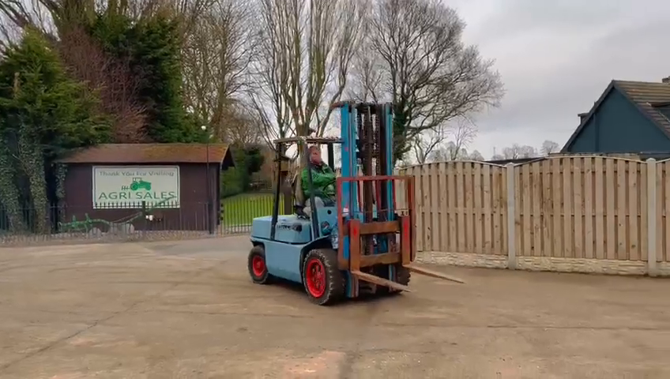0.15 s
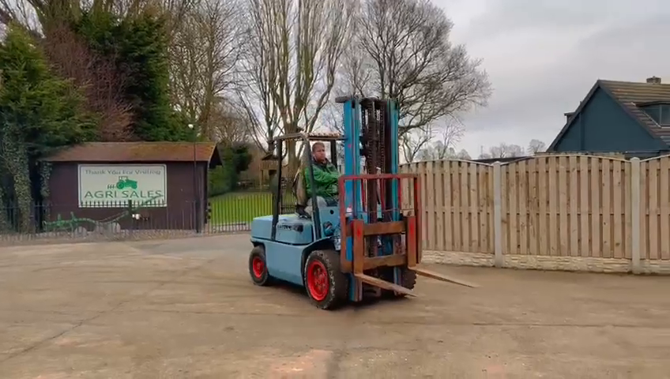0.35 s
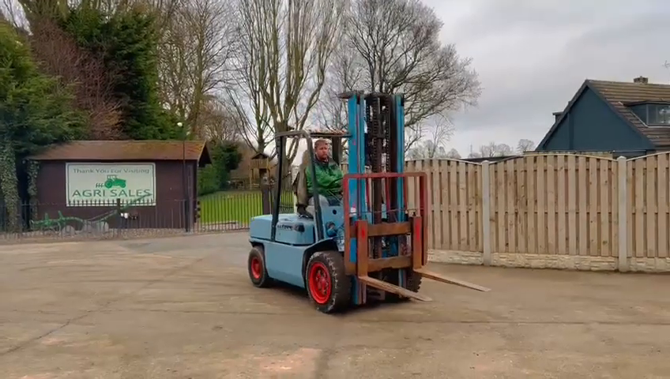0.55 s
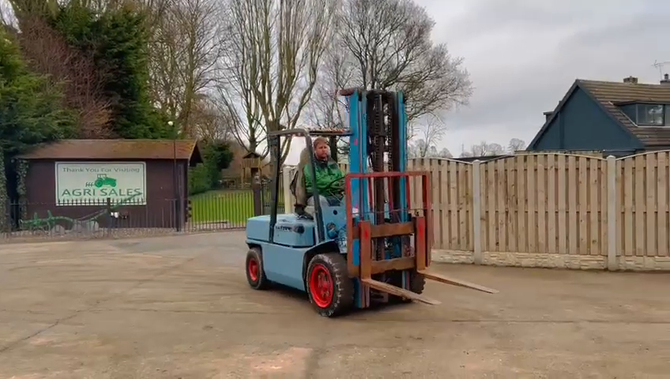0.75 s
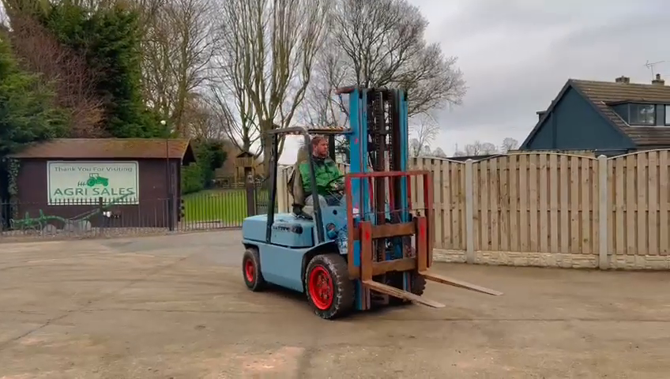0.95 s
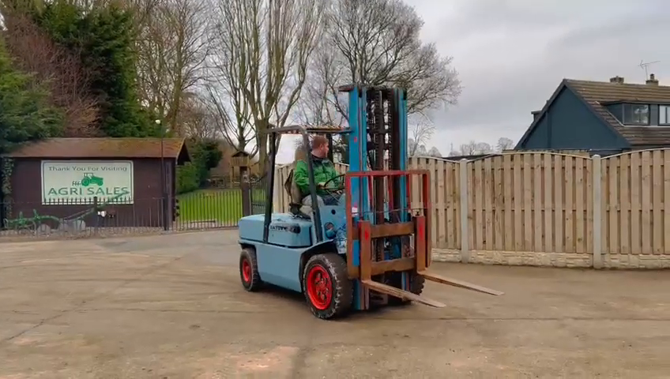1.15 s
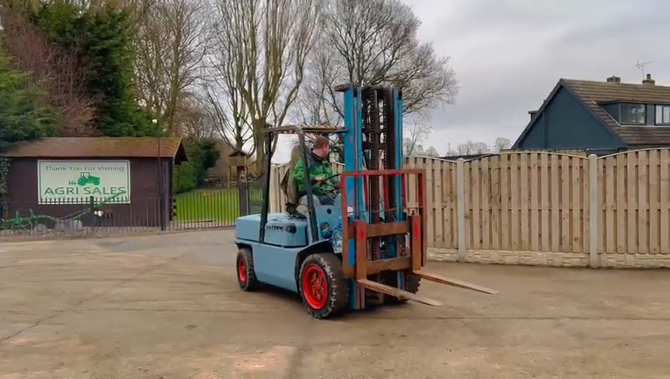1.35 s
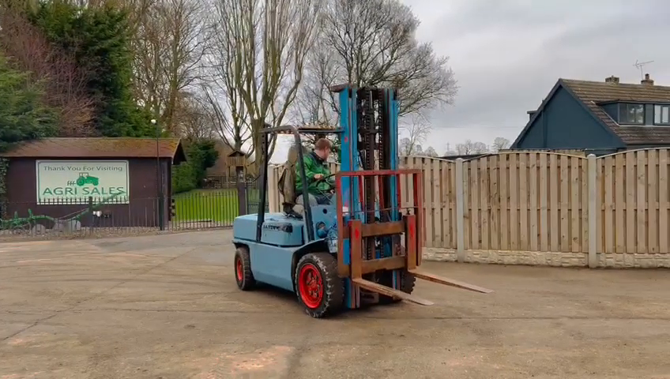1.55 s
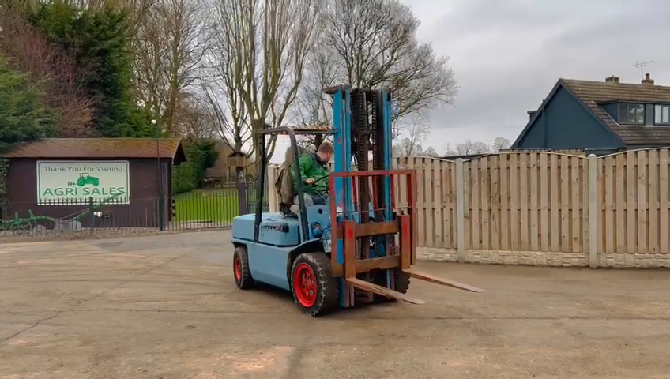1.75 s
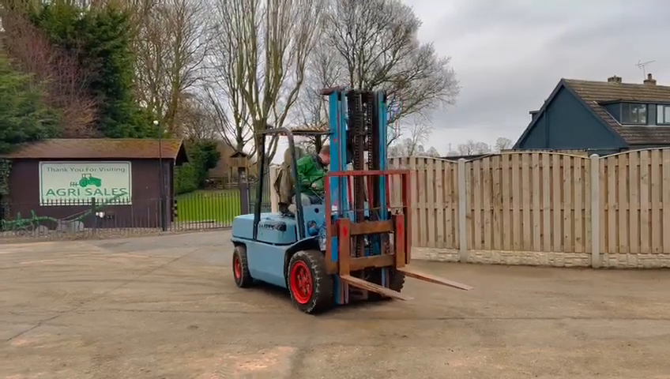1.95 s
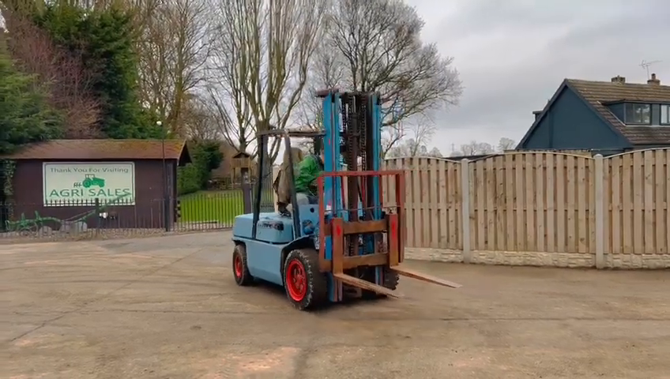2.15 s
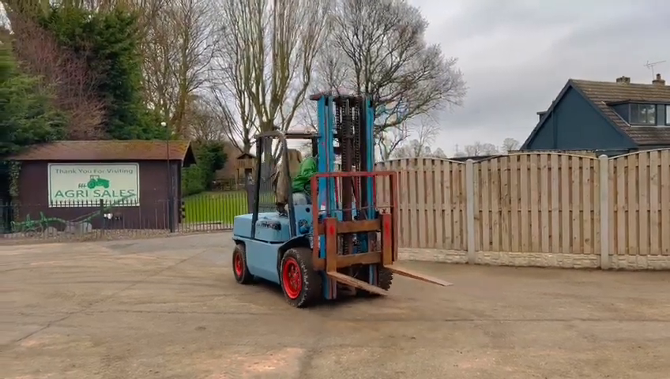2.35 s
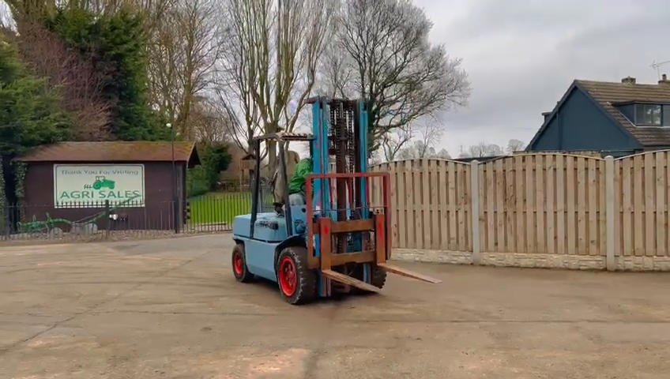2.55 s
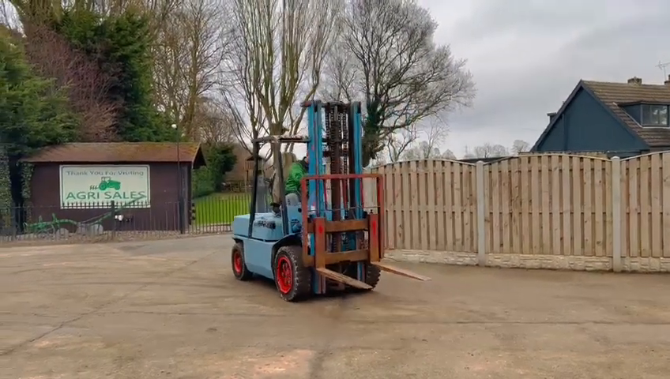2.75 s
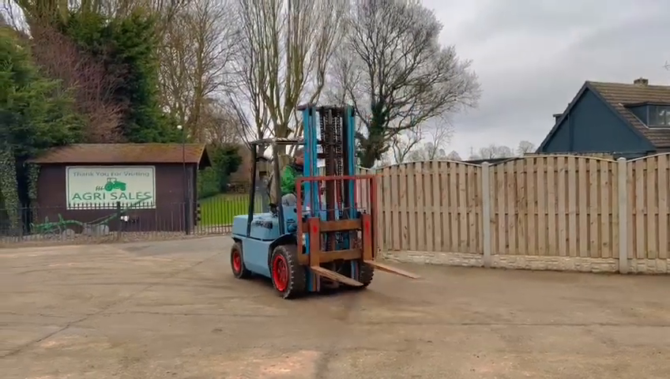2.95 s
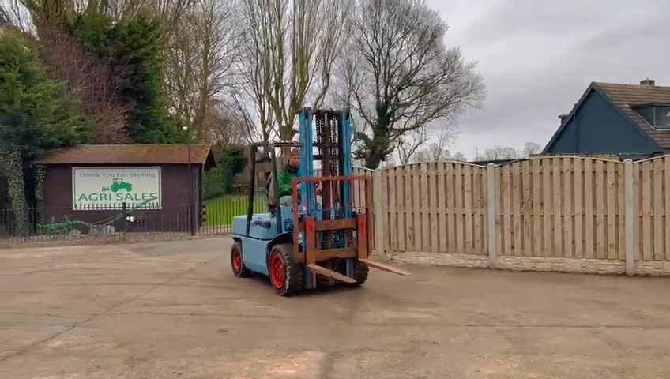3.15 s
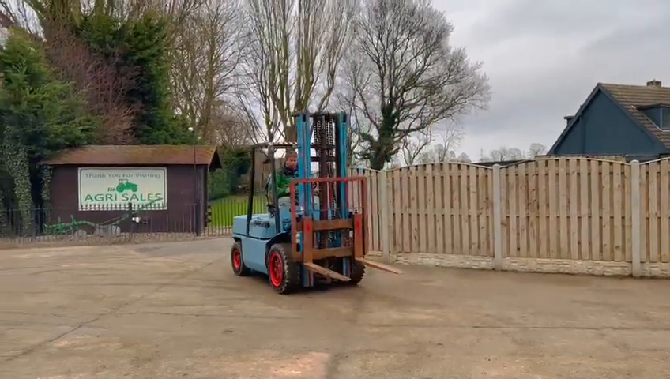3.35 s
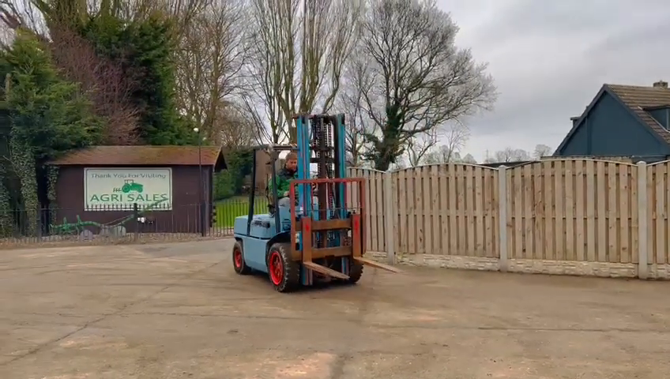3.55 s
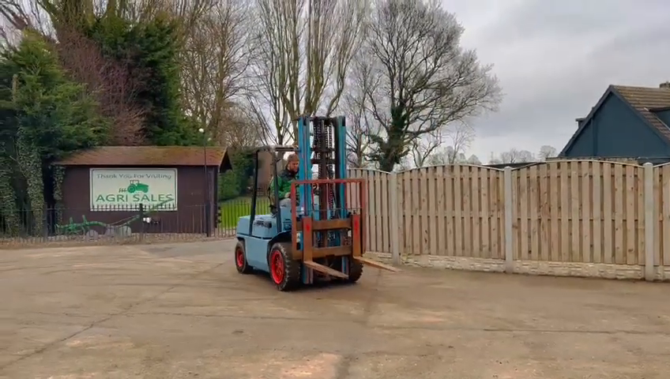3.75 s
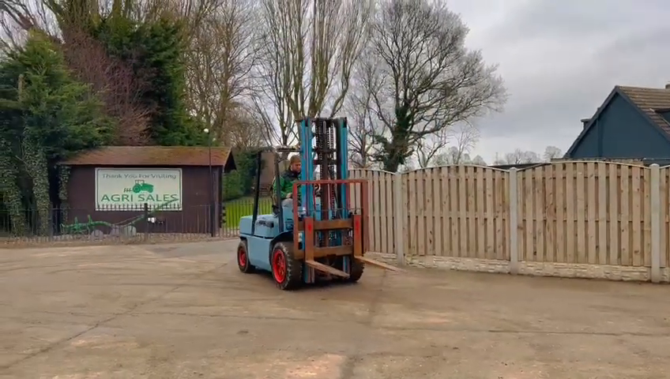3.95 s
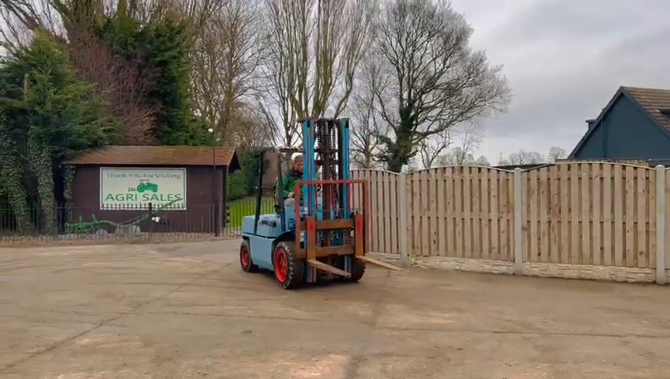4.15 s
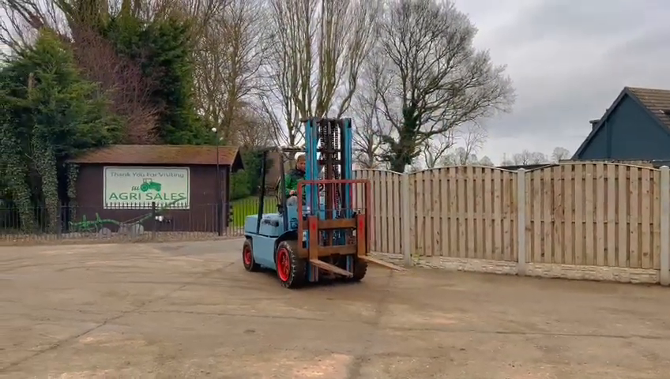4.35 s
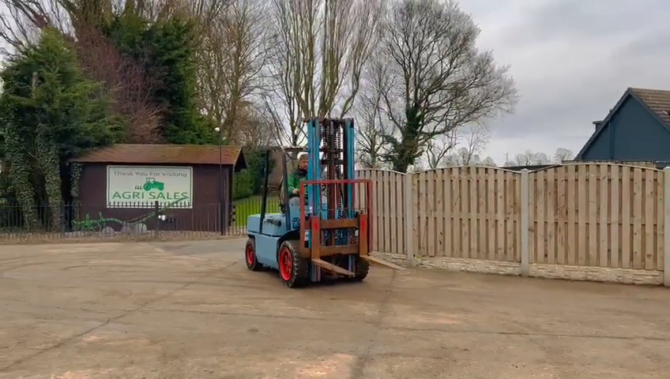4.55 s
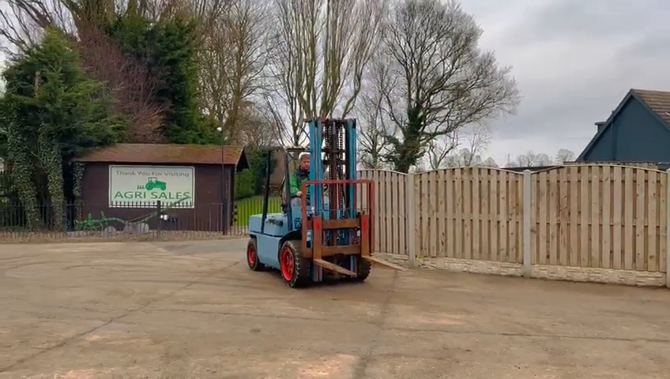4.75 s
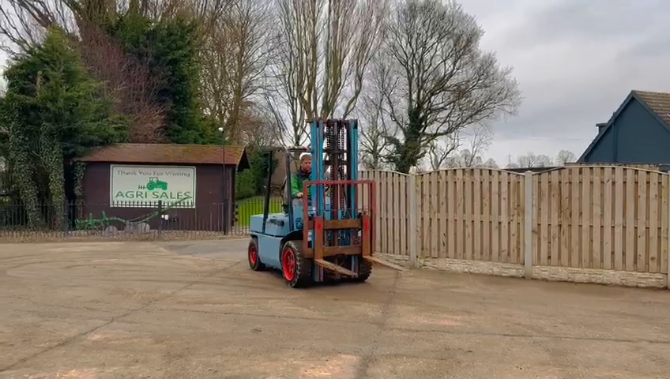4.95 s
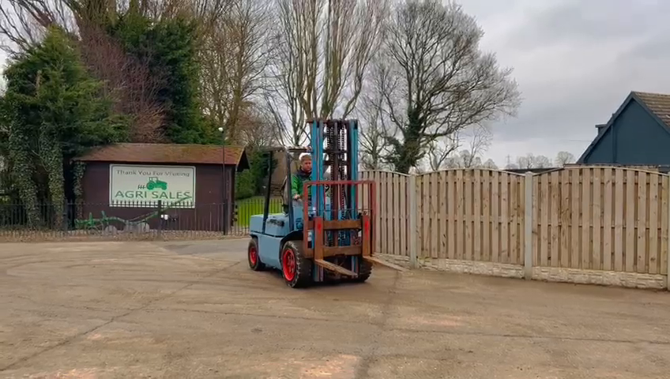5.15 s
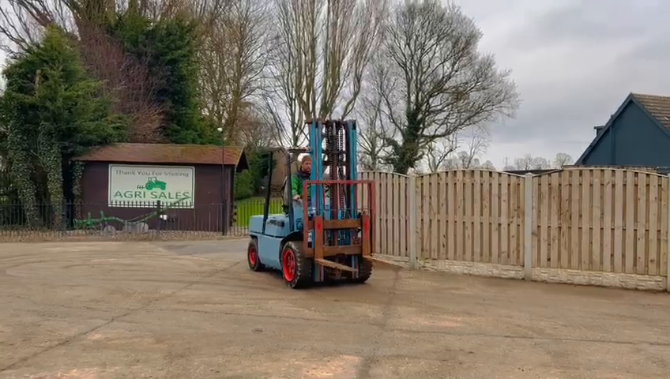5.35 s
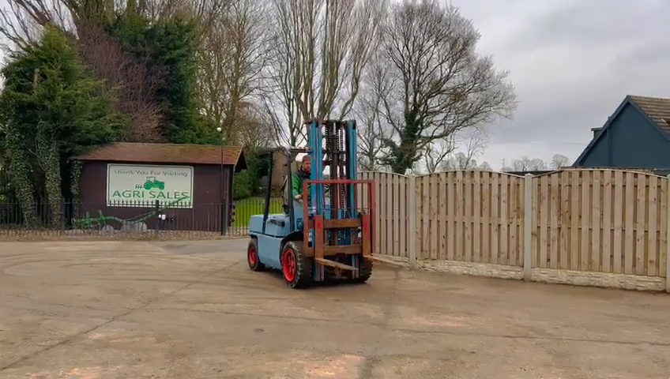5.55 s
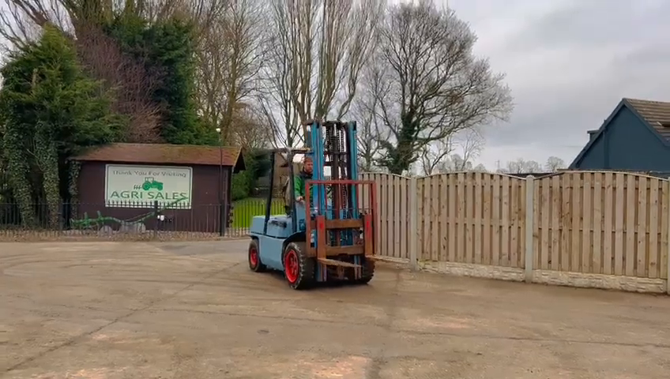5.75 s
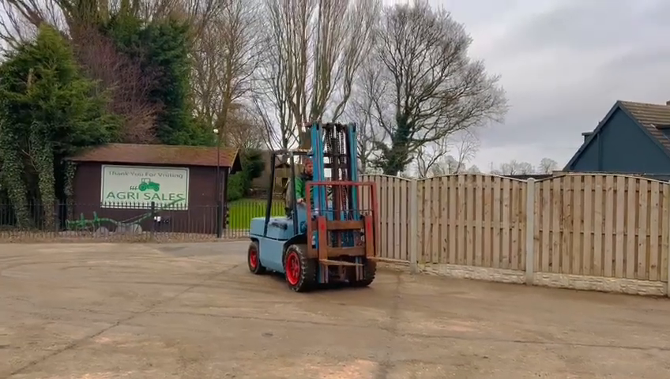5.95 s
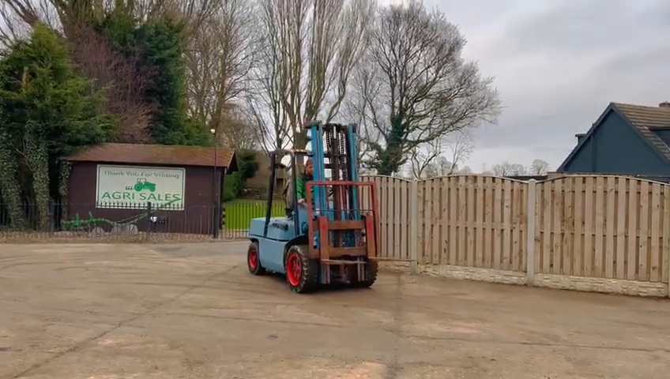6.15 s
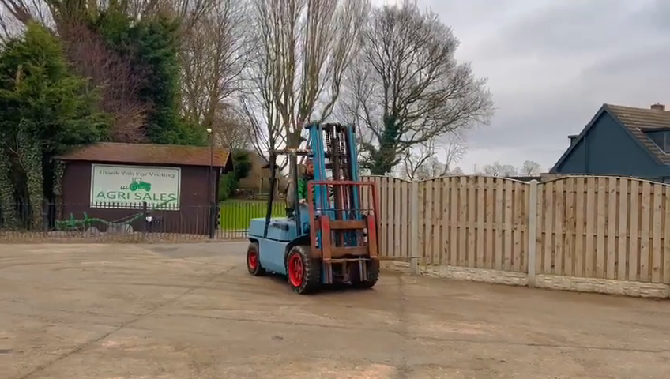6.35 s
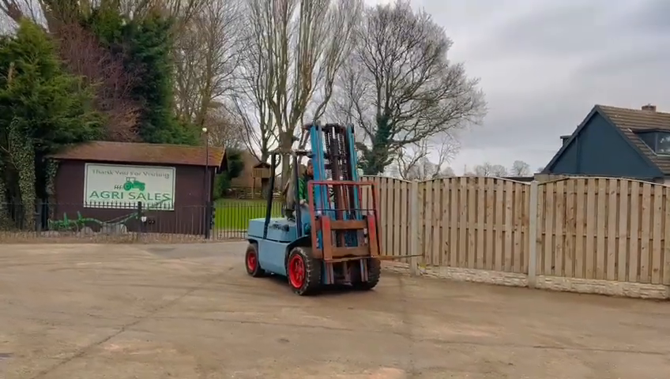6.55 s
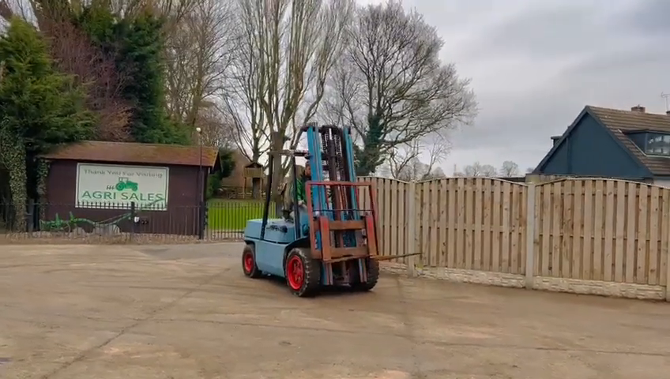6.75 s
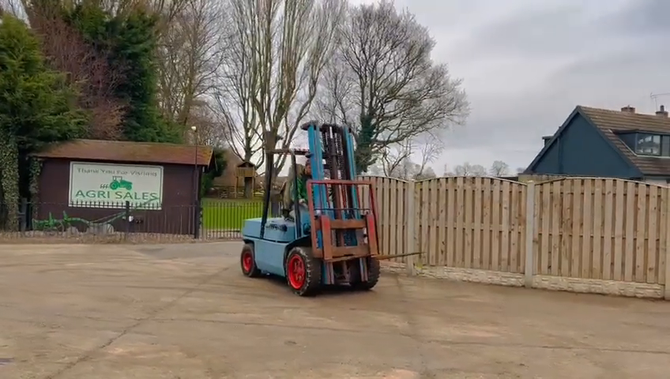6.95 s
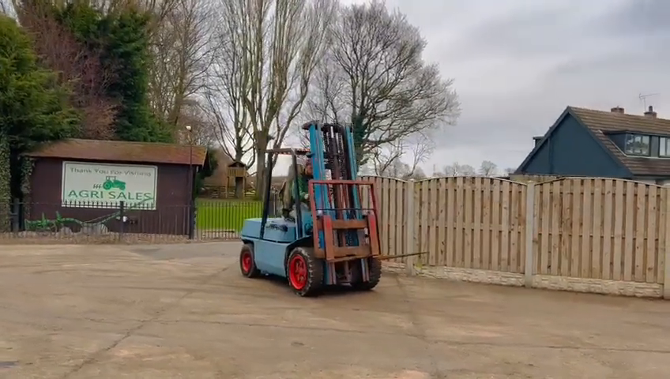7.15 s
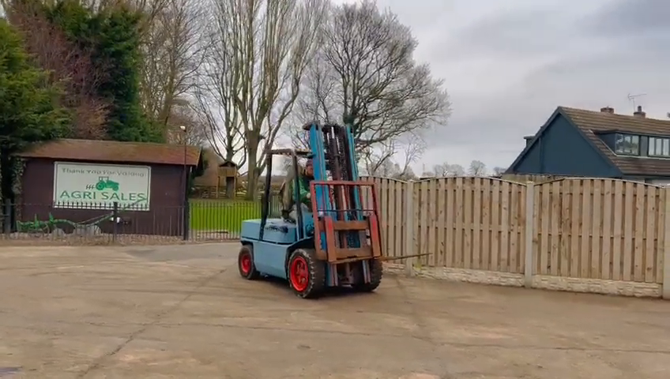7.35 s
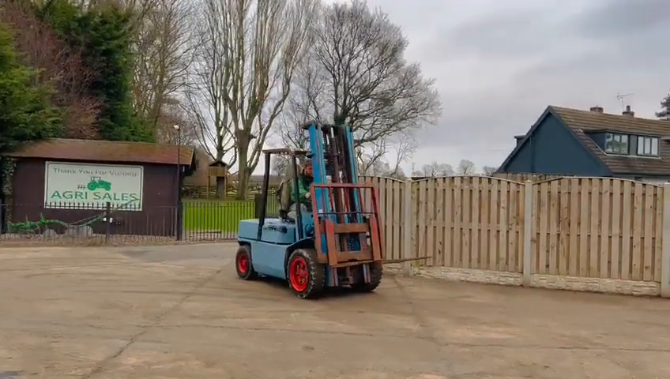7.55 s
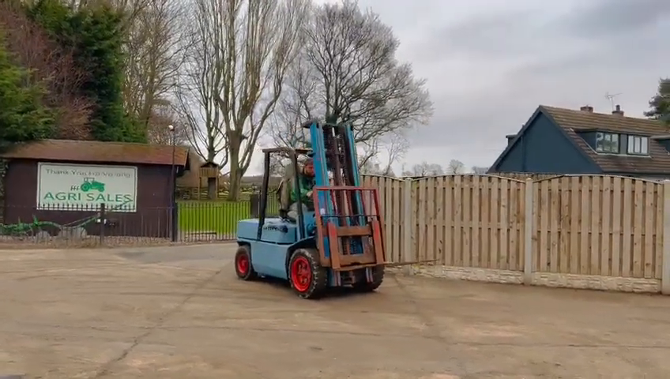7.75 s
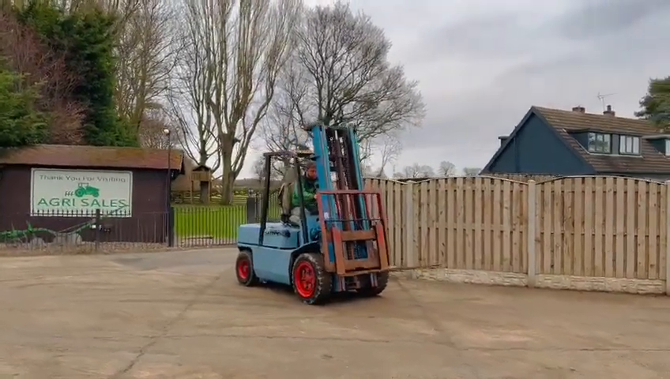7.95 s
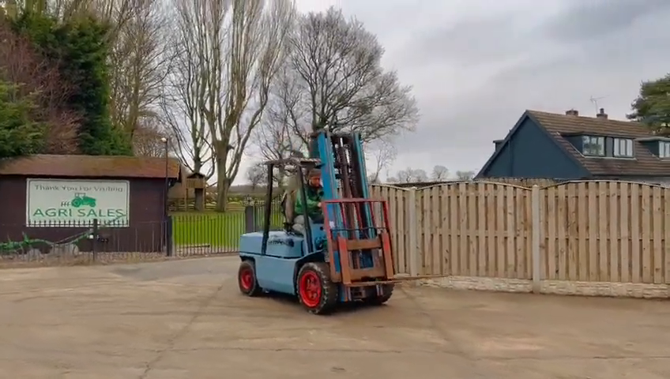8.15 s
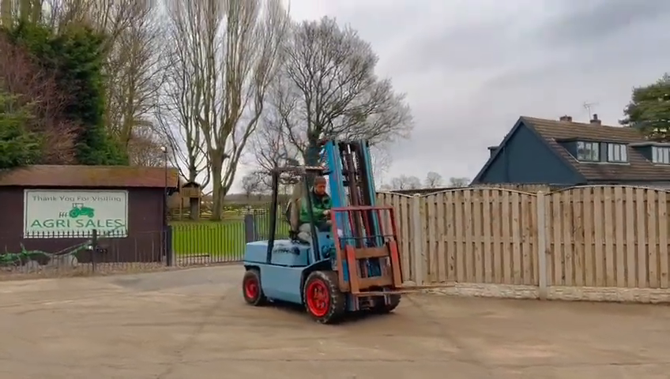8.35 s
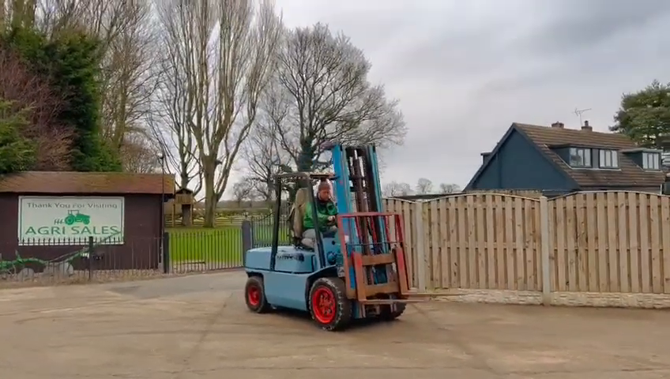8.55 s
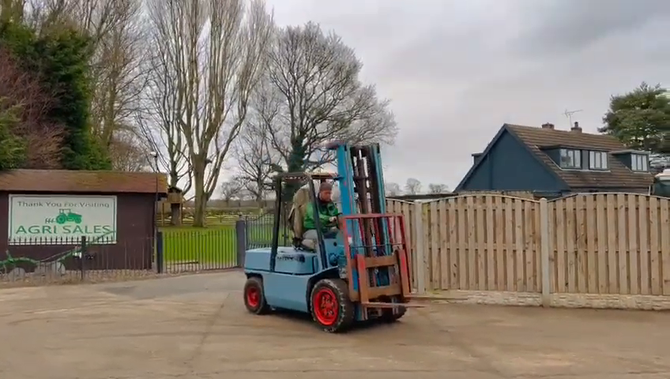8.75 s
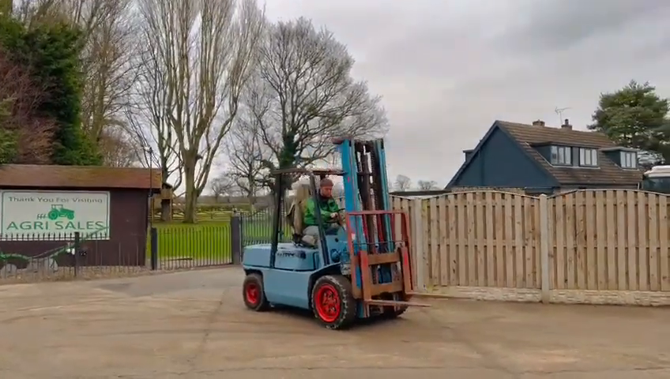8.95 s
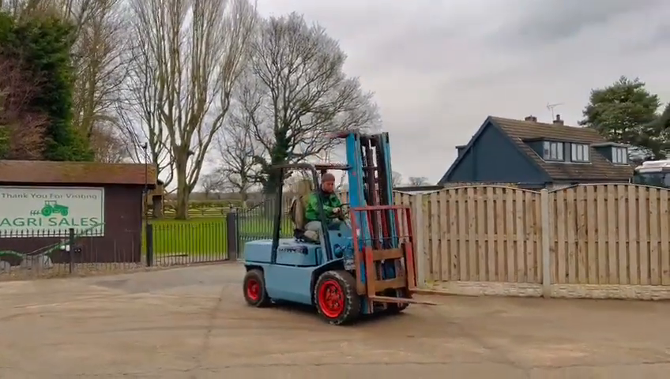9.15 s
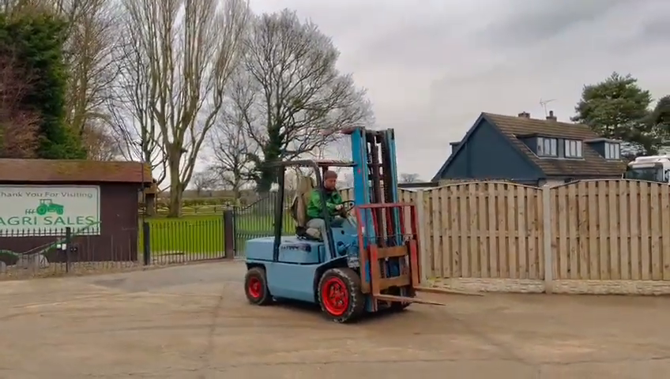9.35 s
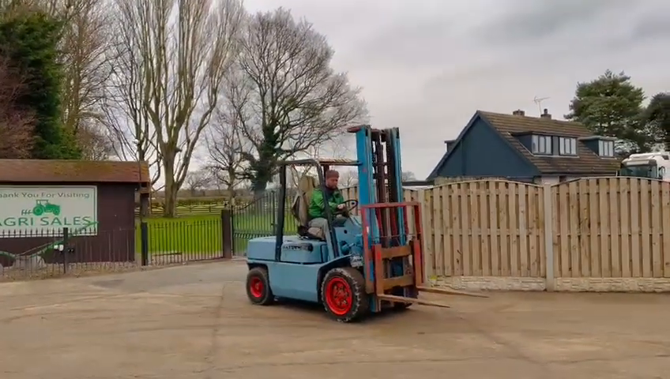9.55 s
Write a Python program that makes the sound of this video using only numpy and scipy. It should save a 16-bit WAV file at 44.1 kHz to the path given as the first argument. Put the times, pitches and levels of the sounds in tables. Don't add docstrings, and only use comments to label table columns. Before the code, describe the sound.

Outdoors in stereo, a nearby old diesel truck with lifting forks drives back and forth. Its engine growls and clatters in short throttle surges, drops into slow lumpy knocking, revs sharply again and settles into working growl. Bright hard firing bursts open some surges; low exhaust tones hum and waver. Loose steel forks knock with muffled double clunks. Fence and ground scatter the upper clatter across both sides.

```python
import sys
import numpy as np
from scipy import signal
from scipy.fft import rfft, irfft, next_fast_len
from scipy.io import wavfile
from scipy.ndimage import uniform_filter1d, map_coordinates

SR = 44100
rng = np.random.default_rng(int(sys.argv[2]) if len(sys.argv) > 2 else 0)


def output_pcm(signal):
    pcm = np.clip(np.atleast_2d(signal).T, -1, 1) * 32767
    wavfile.write(sys.argv[1], SR, np.round(pcm).astype(np.int16))


def volts_from_db(level):
    exponent = np.asarray(level, float) / 20
    return 10 ** exponent


N = 424241

# (time [s], asked firing rate [Hz], load [dB], injection knock [dB])
PEDAL_STROKES = [(0.021, 49.0, 2, 0), (0.157, 59.8, -2, -2), (0.221, 73.4, 0.5, 7), (0.457, 28.2, -1.5, -1),
                 (0.76, 64.8, 3.5, 2.5), (1.128, 38.3, 2, -1.5), (1.585, 61.2, 3, 2.5),
                 (1.966, 43.3, 1, -1), (2.359, 54, 1.5, 0.5), (2.551, 55.2, -0.5, 3),
                 (2.82, 7.6, -15.5, 10.5), (3.22, 42.9, 0.5, -4), (3.5, 10.1, -12.5, 8),
                 (3.69, 29.2, -2, -0.5), (3.94, 26.9, -7, 4.5), (4.198, 29.1, -9, 5.5),
                 (4.772, 73.5, 4.5, -5.5), (4.901, 91.2, 0, 7.5), (5.103, 80.6, -3, 5.5),
                 (5.235, 20.2, 0.5, -6), (5.522, 70.0, 4.5, -5), (5.654, 45.8, 1.5, 2.5),
                 (5.957, 49.8, 2.0, 4), (6.408, 48.9, 1.5, 4.5), (6.777, 44.5, 2.0, 3),
                 (7.093, 89.5, 0.5, 6.5), (7.276, 72, -2, 1.5), (7.417, 60, -4.5, 1.5),
                 (7.593, 55.6, -2.5, 1.5), (8.018, 29.8, 1.5, -3), (8.135, 36.8, 2, 0),
                 (8.38, 54.5, 2, 3.5), (8.857, 44, 1.5, -1.5), (9.324, 56, 1.5, 1)]
START_RATE_HZ, USUAL_RATE_HZ = 26.2, 48
LINKAGE_S, FLYWHEEL_S, LOAD_LAG_S, SURGE_LAG_S = .03, .4, 0.093, 0.27
INJECTION_LEAD_S = 0.041
# (time [s], bonnet over block [dB], second order [dB], third order [dB], valve gear [dB])
FACING_SIDES = [(0, -0.5, 0, -2, -10), (.15, -5.5, 0, 6.5, -4.5), (.3, -6.5, 0, 2.5, -8.5),
                (.6, -4.5, 5, -2.5, -5), (1, -6, 2, 1, -5), (1.5, -7.5, 1.5, -3, -1), (2.2, -5, 3, 0.5, -1),
                (2.7, -4, 2.5, -1.5, -2), (3.1, -18, 5.5, 7, -7), (3.5, -11, 6, 3, -4),
                (4.3, -6, 0.5, 2, -4.5), (4.87, -9, 3.5, -2, -5), (5.1, -14.5, -7.5, 4.5, 0),
                (5.5, -11.5, 1, -3, 1), (6.2, -9, -4, 2.5, -3), (6.6, -5, -2, -0.5, -4.5),
                (6.9, -5, -1.2, 0, -2.5), (7.15, -3.5, -3, 0.5, 3.5), (7.3, -1.5, -2, 2.5, 1.5),
                (7.6, -0.5, 0.5, -2, 3.5), (8.3, -1.5, 1.5, 3, -2.5), (8.7, -3.5, -3.2, 0.5, 1),
                (9.1, -7, 0, 0.5, 3), (9.62, -2.5, -1.5, 2.5, 1.5)]
# (usual level [dB], speed [dB/octave], load [dB/dB], speed shortfall [dB/Hz])
BLOCK_LAW, KNOCK_LAW = (-26.5, 7.5, 0.43, 0.13), (-45.5, 7.5, 1.11, 0.2042)
RAPS_DB, RAPS_PER_OCTAVE_DB = -1.5, -7.5

# (pulse size [dB], arrival delay [ms], knock [dB])
CYLINDER_TRAITS = [(1.2, 0.01, 1.5), (-1.5, 1.6, -1.5), (.6, -1.2, .4), (-7, .8, -2.5)]

# (frequency [Hz], density [dB/Hz])
BODY_SPECTRUM = [(120, -35.5), (200, -2), (512, -3), (588, -1.5), (645, -5), (873, -3.5), (936, -2.5),
                 (1650, -8.5), (2450, -17), (3200, -21.5), (4160, -77.5), (7040, -120)]
# (frequency [Hz], width [Hz], level [dB], place in cycle [0-1])
BLOCK_PANELS = [(421.6, 13, -4.5, .75), (384, 7.1, -8.5, .25), (299.4, 6.1, -7, 1), (546, 6.9, -4, 0.4),
                (559, 59, -1.5, .53), (459, 35, -4.5, .6), (607.5, 16, -1, 0.05), (775, 7, -0.5, 0.5),
                (875.6, 15, 3.5, .26), (826, 24, 0.5, .76), (1007, 6.5, -12, 0.96), (1944, 15, -9.5, .15),
                (2233, 42, -13, 0.4)]
# (frequency [Hz], width [Hz], place in cycle [0-1])
BONNET_NEAR = (1251.5, 36, .5)
# (frequency [Hz], width [Hz], place in cycle [0-1])
BONNET_CORNER = (1130, 64, .5)
# (start [s], end [s])
TRUCK_SWING_S = (8.6, 8.85)

# (frequency [Hz], density [dB/Hz])
KNOCK_SPECTRUM = [(880, -32.5), (1500, -3), (1690, -7.5), (1950, -5), (2500, -3.5), (3280, -7), (3550, -6),
                  (4420, -15), (4900, -15.5), (5630, -18), (8600, -25.5), (11200, -30), (18900, -120)]
# (frequency [Hz], width [Hz], level [dB])
LINER_MODES = [(2040, 200, -3), (2513, 260, -3.5), (3990, 540, -7), (4830, 110, -0.5)]
LINER_DB, LINER_FITS_DB = -5.5, 7
# (frequency [Hz], width [Hz], level [dB])
VALVE_MODES = [(4340, 590, -0.5), (4680, 84, 0), (5600, 110, 5), (6450, 340, -5.5), (2250, 110, 1)]

# (firing rate [Hz], order 1 [dB], 2 [dB], 3 [dB], 4 [dB])
PIPE_ORDERS = [(24.9, -50, -40.5, -37, -31), (32.9, -43, -22.5, -24, -23.5),
               (40.2, -34, -14.5, -20.5, -22.5), (46.6, -28, -22, -26, -26.5),
               (46.8, -25, -18, -23.5, -44.5), (51.2, -22, -19, -21, -38), (60.3, -18.5, -17.5, -24, -26),
               (68.4, -14.5, -20.5, -5.5, -42.5)]
# (order 1 [dB/dB], 2 [dB/dB], 3 [dB/dB], 4 [dB/dB])
ORDER_LOAD_SLOPES = (1.6, 0.74, 2.76, 1.5)
UNSTEADY_DB, OVERRUN_LOSS_DB_PER_HZ, FOURTH_SHARE = 1.5, 0.53, 1.22

# (frequency [Hz], level [dB])
PIPE_COLOUR = [(15, -32), (35, -16), (55, 10), (80, 2), (112, 0.5), (140, 9), (165, -15), (200, -6.5),
               (240, -1), (290, -37.5), (345, -32), (385, -14), (430, -53)]
# (frequency [Hz], width [Hz], level [dB])
SILENCER_CHAMBER = (186, 9, 16)
# (firing rate [Hz], level [dB])
THROB_LEVELS = [(25, -32.5), (32, -31.5), (40, -28.5), (46, -24), (49, -27.5), (53, -28.5), (65, -23.5)]

# (frequency [Hz], width [Hz], level [dB])
TAILPIPE_MODES = [(186, 16.8, 2), (146.5, 17, -2)]
PUFF_LEVELS_DB = (-.5, -10, -.5, 2)
# (firing rate [Hz], level [dB])
BOOM_LEVELS = [(24, -55), (27, -24.5), (30, -29), (34, -21), (42, -24.5), (47.5, -22.5), (50, -34.5),
               (65, -42.5)]
BOOM_PER_OVERRUN_DB_PER_HZ, OVERRUN_FULL_HZ = -1, 1.2

# (frequency [Hz], density [dB/Hz])
YARD_SPECTRUM = [(12, -5), (30, -1), (70, 0.5), (250, -23.5), (330, -13.5), (480, -12), (700, -53)]
# (time [s], peak [dB])
COLD_SNAPS = [
    (0.2603, -30.5),
    (0.288, -20),
    (3.3934, -30),
    (4.8344, -23.5),
    (4.937, -21.5),
    (5.022, -28),
    (5.322, -31),
    (7.24, -26.5),
]
# (time [s], length [s], start frequency [Hz], end frequency [Hz], rms level [dB])
SINGING_TONES = [(.5, 0.35, 188.3, 168, -21), (.7, 0.23, 160, 177, -22), (0.918, .8, 765, 763.5, -35.5),
                 (1.32, 0.41, 186, 181.6, -25), (1.7, 0.4, 860.2, 839.5, -34),
                 (2.2, 0.46, 188.2, 199.3, -22), (2.3, 0.57, 836.7, 854, -36),
                 (2.201, .65, 595, 600, -34.5), (3.75, 1.087, 369.2, 383, -43.5),
                 (3.853, 1.003, 591, 587, -44), (5.363, .36, 191.1, 186, -22),
                 (5.55, 1.27, 601, 599.5, -38), (5.851, 1.084, 767, 771.4, -36),
                 (6.279, 0.65, 872.6, 868, -29), (6.201, 0.75, 563.6, 559, -38),
                 (7.252, 0.31, 860.4, 883, -26), (7.5, 0.37, 163.3, 149, -30),
                 (8.62, 0.43, 896, 894.5, -28), (9.022, 0.57, 870, 866.5, -40.5)]
SWELL_S = .12

# (time [s], peak [dB], closing time [ms])
MAST_CLUNKS = [(2.967, -29, 4), (3.029, -33, 2.5), (3.193, -12.5, 0.8), (3.391, -31.5, 5.4), (3.55, -23, 6),
               (3.598, -20.5, 7.1), (3.679, -17, 6.9), (3.828, -32, 1.1), (4.26, -28, 1), (5.331, -3, 2.4),
               (5.454, -20, 1), (5.56, -10, 3.3), (6.78, -7.5, 14), (7.009, -1, 2.7), (8.055, -13.5, 7.3),
               (8.116, -14, 8), (8.197, -19.5, 9), (9.165, -14, 1), (9.491, -15.5, 0.89)]
# (frequency [Hz], level [dB], t60 [s])
MAST_MODES = [(345, -7, .07), (402, -7, .08), (460, -8, .08), (545, -7, .07), (850, -10, .05),
              (1270, -14, .06), (1850, -15, .08)]
REBOUND_S, REBOUND_DB, CRACK_DB = .013, -2, -6

# (frequency [Hz], likeness [0-1], left over right [dB])
PORT_BLEND = [(250, 1, 0), (600, 0.9, 0.5), (920, 0.97, 2), (1204, 0.54, 8.5), (1430, 0.9, 0),
              (1690, 0.5, 1.5), (2650, 0.2, -1.5), (3390, 0.58, 2), (3480, 0.5, -1.5), (4060, 0.1, 3),
              (5000, 0.3, 4), (5570, 0.61, 5), (7200, 0, -0.5), (8160, 0.76, -4.5), (8300, 0.65, 4.5)]
# (frequency [Hz], lead [rad])
LEFT_LEAD = [(600, 0.75), (1030, 1.58), (1300, 0.4), (1620, 2.67), (1980, 7.5), (2410, 5.8), (2930, 9.29),
             (3450, 8.26), (3960, 11.2), (4800, 14), (5680, 10.6), (6250, 14), (8000, 12.35), (8950, 9.78)]
# (frequency [Hz], lead [rad])
LEFT_LEAD_FROM = (280, 0)
# (time [s], share [0-1])
BEARING_SHARE = [(0, 0.04), (6.9, 0.05), (7.4, 0.94), (8.6, 0.15), (9.62, 1)]


def unit(x):
    return x / np.sqrt(np.mean(x ** 2) + 1e-20)


def along(points, hz, column=1):
    rows = np.transpose(points)
    return np.interp(np.log(hz + 1), np.log(rows[0] + 1), rows[column])


def curves(rows):
    s, *columns = np.transpose(rows)
    return [np.interp(np.arange(N) / SR, s, c) for c in columns]


def by_speed(rows, rate_hz):
    speeds, *columns = np.transpose(rows)
    return [np.interp(rate_hz, speeds, c) for c in columns]


def wobble(rate_hz):
    knots = rng.standard_normal(int(N * rate_hz / SR) + 4)
    return map_coordinates(knots, [np.arange(N) * rate_hz / SR])


def lagged(x, seconds):
    keep = np.exp(-1 / (seconds * SR))
    return x[0] + signal.lfilter([1 - keep], [1, -keep], x - x[0])


def ahead(x):
    return np.pad(x, (0, round(INJECTION_LEAD_S * SR)), "edge")[-N:]


def filtered(x, response):
    m = next_fast_len(N + SR // 2)
    return irfft(rfft(x, m) * response(np.fft.rfftfreq(m, 1 / SR)), m)[..., :N]


def causal(points):
    def response(hz):
        fold = irfft(np.log(volts_from_db(along(points, hz)) + 1e-6))
        fold[1:len(fold) // 2] *= 2
        fold[len(fold) // 2 + 1:] = 0
        return np.exp(rfft(fold))
    return response


def resonances(modes):
    def response(f):
        total = 0
        for k, (hz, width_hz, db) in enumerate(modes):
            damping = 1j * f * width_hz
            total = total + (-1) ** k * volts_from_db(db) * damping / (hz * hz - f * f + damping)
        return total
    return response


def peaked(x, hz, q):
    return signal.lfilter(*signal.iirpeak(hz, q, SR), x)


def even(x, seconds=0.077):
    size = int(seconds * SR)
    power = uniform_filter1d(uniform_filter1d(x ** 2, size), size)
    return x / np.sqrt(np.abs(power) + 1e-20)


def blows(samples, db):
    return np.bincount(np.clip(samples.astype(int), 0, N - 1), volts_from_db(db), N)


def bursts(pulses, t60_s, rise_s):
    decay = signal.lfilter([1], [1, -volts_from_db(-60 / (t60_s * SR))], pulses)
    return uniform_filter1d(decay, int(rise_s * SR))


def struck(turns, hz, width_hz, place, every=4, scatter_db=5.5):
    at = np.flatnonzero(np.diff(np.floor(turns / every - place)))
    rap = blows(at, min(scatter_db, 2) * rng.standard_normal(len(at)))
    return unit(peaked([rap, np.roll(rap, 300)], hz, hz / width_hz))


def driving():
    s, asked, *levels_db = np.transpose(PEDAL_STROKES)
    stroke = np.searchsorted(s, np.arange(N) / SR)
    asked_hz = lagged(np.r_[START_RATE_HZ, asked][stroke], LINKAGE_S)
    rate_hz = lagged(asked_hz, FLYWHEEL_S)
    load_db, injection_db = [lagged(db[np.maximum(stroke - 1, 0)], LOAD_LAG_S) for db in levels_db]
    surge_hz = lagged(np.maximum(asked_hz - rate_hz, 0), SURGE_LAG_S)
    overrun_hz = lagged(np.maximum(rate_hz - asked_hz, 0), SURGE_LAG_S)
    return rate_hz, load_db, injection_db, surge_hz, overrun_hz


def firings(rate_hz, start=.3):
    turns = np.cumsum(rate_hz) / SR + start
    number = np.arange(1, int(turns[-1]) + 1)
    return turns, np.interp(number, turns, np.arange(N)), number % 4


def block(turns, at, cylinder, chance, clatter_db, raps_db):
    hits = blows(at, np.transpose(CYLINDER_TRAITS)[2, cylinder] + 3 * chance[:, 2])
    gate = 0.6 + unit(bursts(hits, 0.18, .015))
    shake = gate * volts_from_db(1.9 * wobble(12)) * rng.standard_normal((2, N))
    modes = resonances([panel[:3] for panel in BLOCK_PANELS])
    hum = unit(filtered(shake, lambda hz: volts_from_db(along(BODY_SPECTRUM, hz)) * (1 + .8 * np.abs(modes(hz)))))
    raps = sum(volts_from_db(db) * struck(turns, hz, width, place) for hz, width, db, place in BLOCK_PANELS)
    bonnet = struck(turns, *BONNET_NEAR) + struck(turns, *BONNET_NEAR, every=0.98, scatter_db=6.5)
    bonnet = peaked(bonnet, BONNET_NEAR[0], 8)
    corner = struck(turns, *BONNET_CORNER) + struck(turns, *BONNET_CORNER, every=1)
    corner = peaked(corner, BONNET_CORNER[0], 6)
    swung = np.interp(np.arange(N) / SR, TRUCK_SWING_S, (0, .8))
    bonnet = (1 - swung) * unit(bonnet) + swung * unit(corner)
    panels = even(even(hum) + volts_from_db(raps_db) * unit(raps), .25)
    return panels + volts_from_db(clatter_db - 3) * even(bonnet, .25)


def knock(at, cylinder, chance):
    hits = blows(at, np.transpose(CYLINDER_TRAITS)[2, cylinder] + 2.5 * chance[:, 3])
    gate = 1.5 + unit(bursts(hits, .1, .008))
    rattle = gate * volts_from_db(2.5 * wobble(9)) * rng.standard_normal((2, N))
    rattle = unit(filtered(rattle, lambda hz: volts_from_db(along(KNOCK_SPECTRUM, hz))))
    flares = 0
    for hz, width_hz, db in LINER_MODES:
        flare_db = db + along(KNOCK_SPECTRUM, hz) + LINER_FITS_DB * wobble(14)
        flares = flares + volts_from_db(flare_db) * peaked(gate * rng.standard_normal((2, N)), hz, hz / width_hz)
    rattle = rattle + volts_from_db(LINER_DB) * unit(flares)
    closing = cylinder == 0
    tick = bursts(blows(at[closing], 1.5 * chance[closing, 4]), .08, .01) * rng.standard_normal((2, N))
    return even(rattle + volts_from_db(-17) * unit(filtered(tick, resonances(VALVE_MODES))))


def drone(turns, orders_db):
    shifts_turns = (0.011, 0.27, 0.62, 0.11, 0.82)
    orders_db = [*orders_db, orders_db[2] - 18.0]
    out = 0
    for k, (db, shift) in enumerate(zip(orders_db, shifts_turns)):
        out = out + np.sqrt(2) * volts_from_db(db) * np.cos(2 * np.pi * ((k + 1) * turns + shift))
    return out


def throb(at, cylinder, chance):
    size_db, late_ms, _ = np.transpose(CYLINDER_TRAITS)[:, cylinder]
    pulses = blows(at + (late_ms + .12 * chance[:, 0]) * SR / 1000, size_db + 1.1 * chance[:, 1])
    turbulence = volts_from_db(-14) * rng.standard_normal(N) * np.std(pulses)
    chamber = resonances([SILENCER_CHAMBER])
    return even(filtered(pulses + turbulence, lambda hz: causal(PIPE_COLOUR)(hz) * (1 + chamber(hz))), 0.18)


def boom(at, cylinder, chance):
    puffs = blows(at + 160, np.array(PUFF_LEVELS_DB)[cylinder] + .7 * chance[:, 1])
    tailpipe, opening = resonances(TAILPIPE_MODES), resonances([(175, 110, 0)])
    return even(filtered(puffs, lambda hz: tailpipe(hz) * opening(hz)), 0.43)


def yard():
    swell = volts_from_db(2.5 * wobble(4.4))
    murmur = filtered(rng.standard_normal(N), lambda hz: volts_from_db(along(YARD_SPECTRUM, hz)))
    return volts_from_db(-34.0) * swell * unit(murmur)


def snaps():
    s, db = np.transpose(COLD_SNAPS)
    hiss = unit(peaked(rng.standard_normal((2, N)), 2600, 1.1))
    return volts_from_db(-7) * bursts(blows(s * SR, db), 0.13, .003) * hiss


def singing(turns):
    t = np.arange(N) / SR
    out = np.zeros(N)
    for (s, length, from_hz, to_hz, db), start in zip(SINGING_TONES, rng.random(len(SINGING_TONES))):
        span = slice(round(s * SR), round((s + length) * SR))
        u = t[span] - s
        swell = np.sin(np.pi / 2 * np.clip(np.minimum(u, length - u) / SWELL_S, 0, 1)) ** 2
        phase = from_hz * u + (to_hz - from_hz) * u * u / (2 * length) + start
        beat_db = 2.8 * np.cos(2 * np.pi * (turns[span] / 4 + start))
        out[span] += np.sqrt(2) * volts_from_db(db + beat_db) * swell * np.sin(2 * np.pi * phase)
    return volts_from_db(1.8 * wobble(8)) * out


def mast():
    out, t = np.zeros(N + SR), np.arange(SR // 4) / SR
    muffle = signal.butter(4, (350, 2100), "bandpass", fs=SR, output="sos")
    spreads = rng.standard_normal((len(MAST_CLUNKS), 2, len(MAST_MODES)))
    for (s, db, close_ms), spread in zip(MAST_CLUNKS, spreads):
        closing = 1 - np.exp(-1000 * t / max(close_ms, .5))
        for late_s, loss_db, offs in zip((0, REBOUND_S), (0, REBOUND_DB), spread):
            ring = 0
            for (hz, level_db, t60_s), off in zip(MAST_MODES, offs):
                tone = np.sin(2 * np.pi * hz * (1 + .04 * off) * t)
                ring = ring + volts_from_db(level_db + 2 * off - 60 * t / t60_s) * tone
            crack = unit(signal.sosfilt(muffle, rng.standard_normal(len(t))))
            crack = volts_from_db(CRACK_DB - 60 * t / .06) * (1 - np.exp(-t / .0008)) * crack
            out[round((s + late_s) * SR):][:len(t)] += volts_from_db(db - 8.5 + loss_db) * (ring * closing + crack)
    return out[:N]


def scene():
    rate_hz, load_db, injection_db, surge_hz, overrun_hz = driving()
    clatter_db, second_db, third_db, gear_db = curves(FACING_SIDES)

    def law(db, octave, load, fuel):
        return db + octave * np.log2(rate_hz / USUAL_RATE_HZ) + load * load_db + fuel * surge_hz

    block_db = law(*BLOCK_LAW) + 0.42
    knock_db = ahead(law(*KNOCK_LAW) + injection_db) + 7.5
    raps_db = gear_db + law(RAPS_DB, RAPS_PER_OCTAVE_DB, 0, 0)
    orders_db = [db + slope * load_db - OVERRUN_LOSS_DB_PER_HZ * overrun_hz + UNSTEADY_DB * wobble(9)
                 for db, slope in zip(by_speed(PIPE_ORDERS, rate_hz), ORDER_LOAD_SLOPES)]
    orders_db[1] = orders_db[1] + second_db
    orders_db[2] = orders_db[2] + third_db
    orders_db[3] = orders_db[3] + FOURTH_SHARE * second_db
    throb_db = by_speed(THROB_LEVELS, rate_hz)[0] + 0.61 * load_db + 4.0 * wobble(6) + 4.5
    boom_db = by_speed(BOOM_LEVELS, rate_hz)[0]
    boom_db = boom_db + BOOM_PER_OVERRUN_DB_PER_HZ * np.minimum(overrun_hz, OVERRUN_FULL_HZ)

    turns, at, cylinder = firings(rate_hz)
    chance = rng.standard_normal((len(at), 5))
    engine = volts_from_db(block_db) * block(turns, at, cylinder, chance, clatter_db, raps_db)
    engine = engine + volts_from_db(knock_db) * knock(at, cylinder, chance)
    near = drone(turns, orders_db) + volts_from_db(throb_db) * throb(at, cylinder, chance)
    near += volts_from_db(boom_db) * boom(at, cylinder, chance)
    near += yard() + singing(turns) + mast()
    fence = np.pad(near, (640, 0))[:N]
    return engine + snaps() + np.array([near, fence])


def band_limit(x):
    return signal.sosfilt(signal.butter(12, 11700, fs=SR, output="sos"), x)


def record(dry):
    def turn(hz):
        return np.arccos(np.clip(along(PORT_BLEND, hz), 0, .994)) / 2

    def lean(hz, shrink):
        lead_hz = np.where(hz < 4600, hz * shrink, hz)
        lead_rad = along([LEFT_LEAD_FROM, *LEFT_LEAD], lead_hz)
        return volts_from_db(along(PORT_BLEND, hz, column=2) / 2) * np.exp(.5j * lead_rad)

    def both(hz):
        return [[lean(hz, shrink), 1 / lean(hz, shrink)] for shrink in (1, .9)]

    alike, apart = filtered(dry, lambda hz: [np.cos(turn(hz)), np.sin(turn(hz))])
    in_front, aside = filtered(np.array([alike + apart, alike - apart]), both)
    share, = curves(BEARING_SHARE)
    return band_limit((1 - share) * in_front + share * aside)


dry = scene()
out = record(dry)
output_pcm(out)
```